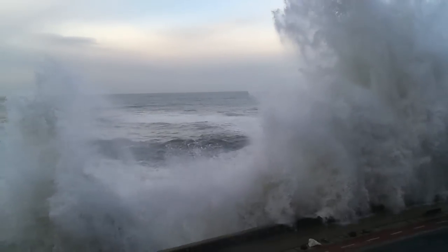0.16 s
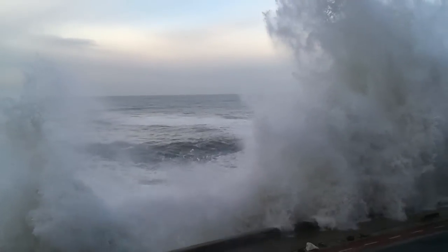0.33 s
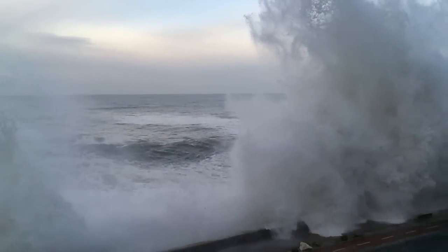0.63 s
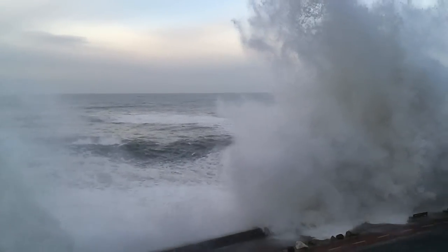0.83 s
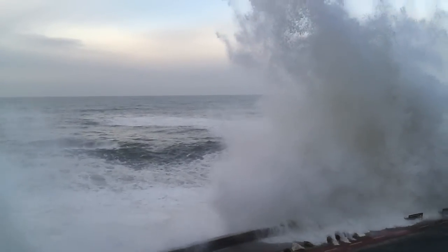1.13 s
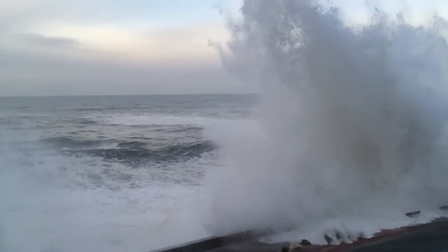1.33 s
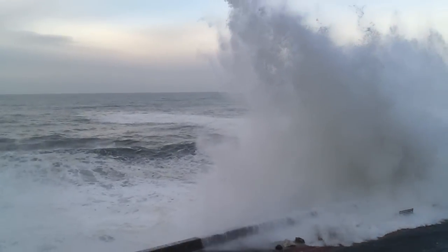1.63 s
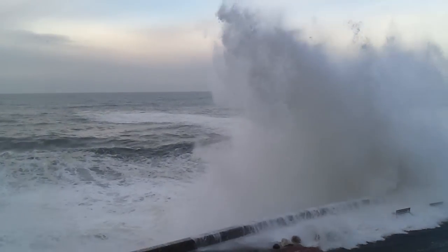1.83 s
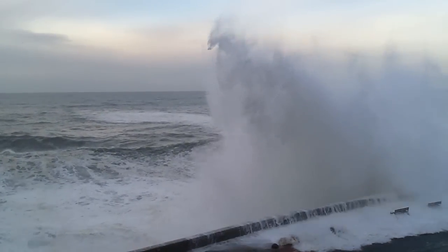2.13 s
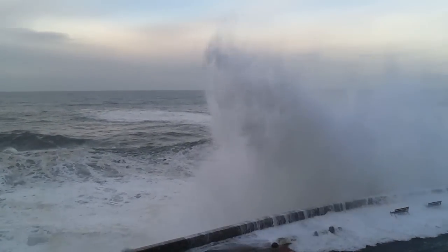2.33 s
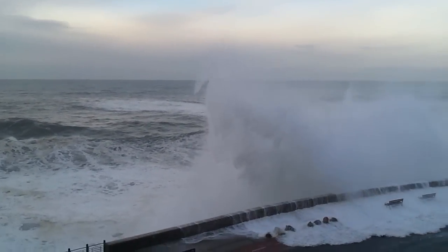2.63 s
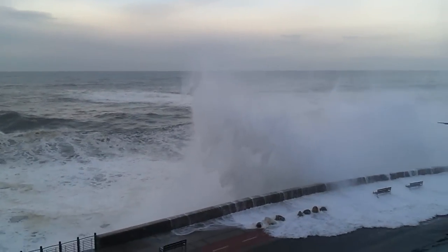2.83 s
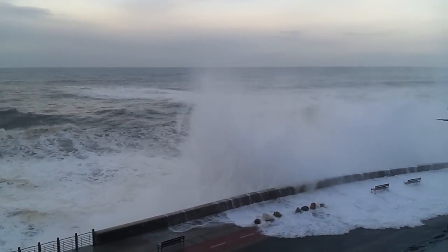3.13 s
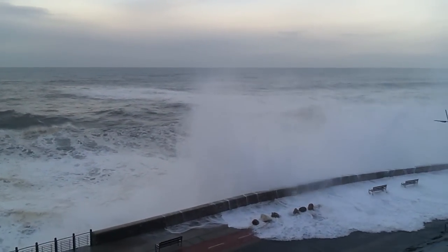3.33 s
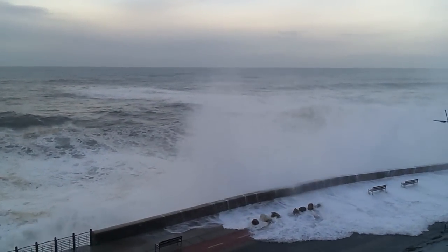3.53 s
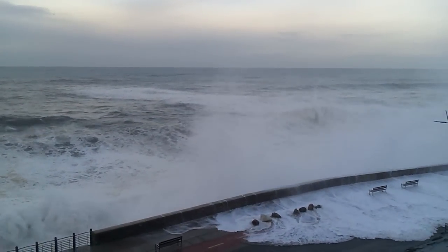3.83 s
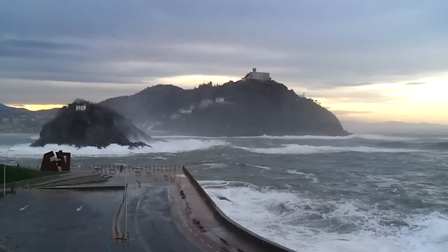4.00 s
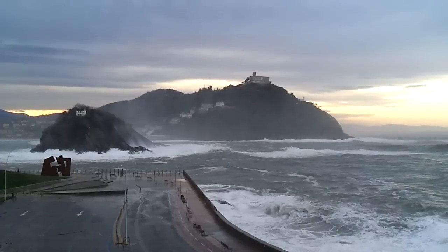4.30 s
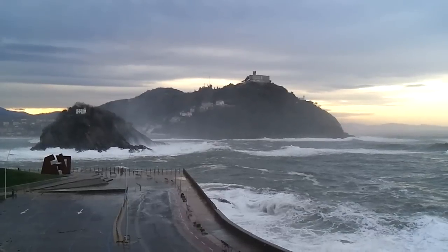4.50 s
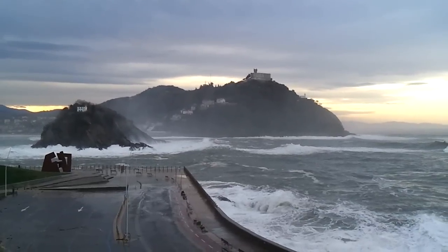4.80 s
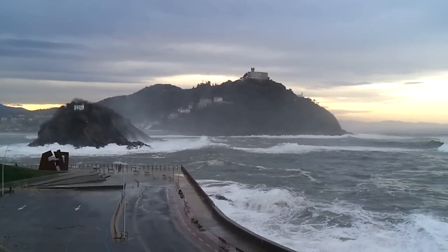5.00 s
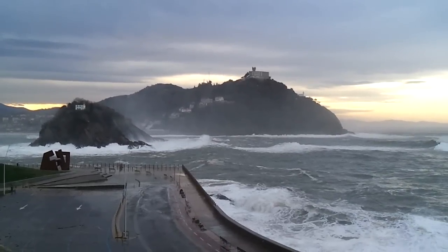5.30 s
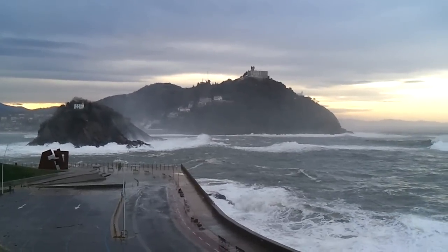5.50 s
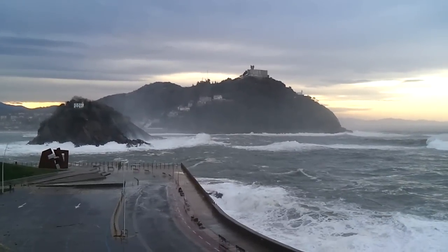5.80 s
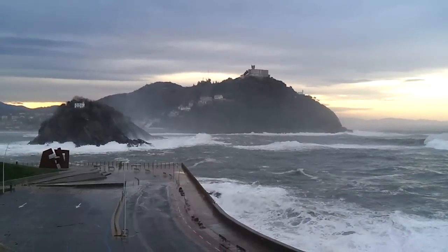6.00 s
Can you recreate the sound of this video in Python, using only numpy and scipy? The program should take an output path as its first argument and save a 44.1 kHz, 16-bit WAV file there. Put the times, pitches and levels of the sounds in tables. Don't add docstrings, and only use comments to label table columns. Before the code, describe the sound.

Outdoors on a stormy seafront, a small exposed microphone catches a wave slamming a wall: low thuds, thick churning roar and a rising bright hiss, with heavy wind rumble. The hiss falls away as drops land and water runs back, foaming again. A brief dead gap follows, then a muffled steady wash of surf farther away, with thin faint hiss and wind bumping the microphone. Essentially mono.

```python
import sys
import numpy as np
from scipy import signal
from scipy.fft import rfft, irfft, next_fast_len
from scipy.io import wavfile

SR = 44100
rng = np.random.default_rng(int(sys.argv[2]) if len(sys.argv) > 2 else 0)


def wrap_up_sound(samples):
    columns = np.atleast_2d(samples).T
    tamed = np.clip(columns, -1, 1)
    steps = np.round(tamed * 32767).astype(np.int16)
    wavfile.write(sys.argv[1], SR, steps)


def natural_amplitude(level_db):
    exponent = np.asarray(level_db, float) / 20
    return 10 ** exponent


N = 271215
T = np.arange(N) / SR

# frequency in Hz, level in dB per Hz.
BURST_LOW = [(1.8, -36.5), (3.0, -0.5), (16, 1.5), (46, -3), (92, -5.5), (209, -17), (245, -16), (328, -21),
             (406, -17), (558, -20), (690, -23), (853, -23), (974, -26), (1410, -25), (1700, -13),
             (2210, -53), (3740, -120)]
NEAR_LOW = [(1.8, -33), (3.0, -3), (21, -2), (54, -0.5), (69, -3), (144, -9.5), (204, -13.5), (245, -11),
            (328, -16), (365, -14.5), (502, -14.5), (620, -17.5), (876, -19.5), (974, -22.5), (1700, -18.5),
            (2210, -51), (3740, -120)]
FAR_LOW = [(1.8, -32.5), (3.0, -22), (15, -3), (28, -5), (102, -13), (133, -17.5), (160, -17.5), (233, -23),
           (265, -20.5), (395, -27), (463, -24.5), (637, -26.5), (747, -29), (1050, -28.5), (1370, -28),
           (1700, -26), (2210, -56), (3740, -120)]
# frequency in Hz, level in dB per Hz.
BURST_HIGH = [(590, -37), (1000, 14), (1410, -8.5), (2060, -0.5), (2900, -10), (3300, -9), (3950, -6),
              (4830, -6), (5620, -2), (6270, -5.5), (8140, -7), (10200, -15.5), (11000, -23.5),
              (12300, -56), (22000, -120)]
FALL_HIGH = [(590, -37), (1000, -7), (1160, 3), (1370, -3.5), (1580, -5), (1960, 0.5), (2720, -9),
             (3320, -9), (3850, -5), (4560, -8.5), (5560, -1), (6260, -5.5), (8190, -6.5), (9690, -12.5),
             (10700, -19), (11900, -49), (22000, -120)]
DRAIN_HIGH = [(590, -37), (1000, -7), (1110, -3), (1220, -1), (1550, -4.5), (1950, 0), (2800, -10),
              (4020, -8.5), (4750, -8), (5610, -8), (6250, -11), (7980, -11), (8800, -16), (9620, -17),
              (10400, -28), (13500, -51), (22000, -120)]
FAR_HIGH = [(590, -30), (1000, -9), (1240, -10.5), (1390, -18), (1630, -12.5), (1820, -15.5), (1980, -20.5),
            (3090, -29), (3890, -23), (4490, -25), (4950, -12.5), (5300, -8), (5830, -15.5), (7560, -15.5),
            (8250, -17.5), (10000, -20), (13000, -55), (22000, -120)]
# time in seconds, peak level in dB.
GUSTS = [(.07, -29), (.22, -23), (.56, -22), (.7, -22.5), (.89, -19), (1.35, -26.5), (1.5, -39),
         (2.08, -28.5), (2.35, -35), (2.52, -33), (2.78, -32), (3.05, -38), (3.56, -37), (3.88, -41),
         (4.64, -32), (4.8, -36), (5.13, -33), (5.42, -30.5), (5.8, -26), (5.92, -30), (6.14, -37)]
# time in seconds, level in dB.
AIRBORNE = [(0.0, -38), (0.14, -35.5), (0.75, -30), (1.12, -27), (1.72, -27.5), (1.95, -30), (2.12, -33),
            (2.5, -35.5), (3.12, -39), (3.5, -37), (4.0, -39), (4.17, -50), (4.35, -50), (6.15, -52)]
# time in seconds, roar gain in dB, foam gain in dB.
HEAVES = [(.12, 1.7, 2), (.3, 1, 2), (.62, 0.1, -0.5), (1.02, 0.8, 0.4), (1.13, 1, 1.5), (2.27, .8, -0.1),
          (2.55, -0.7, -0.5), (3.5, 1.1, -1.3), (3.98, 0.5, 1.8), (4.8, 1, .8), (5.25, -0.5, 0.1)]
# time in seconds, peak level in dB.
AIR_POCKETS = [
    (0.04, -20),
    (0.379, -22),
    (0.604, -22),
    (0.611, -16),
    (1.102, -18),
    (1.324, -19),
]
# time in seconds, low edge in Hz, high edge in Hz, level in dB.
HISS_PATCHES = [
    (.06, 4220, 5300, -46),
    (.06, 5700, 7600, -42),
    (.39, 4200, 5200, -45),
    (1.41, 5700, 7700, -33.5),
    (2.80, 4200, 5260, -54),
    (3.36, 6200, 7700, -45),
    (3.36, 9700, 10500, -60),
    (4.59, 7600, 9100, -62),
    (4.66, 4200, 5160, -51),
    (5.42, 4560, 5800, -53.5),
]

WIND_TOP_HZ, ROAR_TOP_HZ, FOAM_TOP_HZ, SPRAY_TOP_HZ = 36, 1300, 4800, 13000
FALL_S, DRAIN_S, BLEND_S = 2.05, 3.3, 0.18
CUT_S, RESUME_S, RESUME_FADE_S = 4.0042, 4.1713, .002


def rms_one(x):
    return x / np.sqrt(np.mean(x ** 2) + 1e-20)


def ramp(s, length_s):
    return np.clip((T - s) / length_s, 0, 1)


def handover(s):
    return np.pi / 2 * ramp(s - BLEND_S, 2 * BLEND_S)


def drift(size, per_s):
    spacing, settle = 40, 2000
    pole = np.exp(-2 * np.pi * spacing * per_s / SR)
    noise = rng.standard_normal(size // spacing + settle + 2)
    slow = signal.lfilter([1], [1, -2 * pole, pole * pole], noise)[settle:]
    return np.interp(np.arange(size) / spacing, np.arange(len(slow)), rms_one(slow - slow.mean()))


def grains(size, per_s, spread_db):
    born = rng.random(size) < per_s / SR
    uneven = natural_amplitude(spread_db * np.minimum(rng.exponential(1, size), 4))
    return born * rng.standard_normal(size) * uneven


def coloured(source, spectrum, low, high, count, shared_db, own_db, per_s):
    size = len(source)
    points_hz, points_db = np.transpose(spectrum)
    log_hz = np.log(np.maximum(np.arange(size // 2 + 1) * SR / size, 1))
    tone = rfft(source) * natural_amplitude(np.interp(log_hz, np.log(points_hz), points_db))
    step = np.log(high / low) / count
    together, out = shared_db * drift(size, per_s), 0
    for centre in np.log(low) + step * (np.arange(count) + .5):
        share = np.clip(1 - np.abs(log_hz - centre) / step, 0, 1)
        out = out + irfft(tone * share, size) * natural_amplitude(together + own_db * drift(size, 2 * per_s))
    return rms_one(out)


def gusts():
    calm_db, rise_db_per_s, fall_db_per_s = -36.5, 66, 61
    power = natural_amplitude(2 * calm_db)
    for s, db in GUSTS:
        below_peak = np.maximum(rise_db_per_s * (s - T), fall_db_per_s * (T - s))
        power = power + natural_amplitude(2 * (db - below_peak))
    return 10 * np.log10(power)


def wind(size, low):
    return coloured(rng.standard_normal(size), low, 2.5, WIND_TOP_HZ, count=8,
                    shared_db=-1.6, own_db=0.5, per_s=5.0)


def tick():
    age = T - 4.2715
    puff = rng.standard_normal(N) * (age > 0) * np.exp(-np.abs(age) / .0015)
    bright = signal.butter(4, 10000, "high", fs=SR, output="sos")
    return natural_amplitude(-50) * signal.sosfilt(bright, puff)


def hiss_patches():
    size, out = 1900, np.zeros(N)
    hz = np.arange(size // 2 + 1) * SR / size
    for s, low, high, db in HISS_PATCHES:
        noise = irfft(rfft(rng.standard_normal(size)) * (hz > low) * (hz < high), size)
        start = round(s * SR) - size // 2
        out[start:start + size] += natural_amplitude(db) * rms_one(noise) * np.hanning(size)
    return out * [[1], [-1]]


def roar(size, low, churn):
    return coloured(grains(size, 24000, 0.71), low, WIND_TOP_HZ, ROAR_TOP_HZ, count=11,
                    shared_db=.5 * churn, own_db=1.67 * churn, per_s=1.94)


def foam(size, high, churn):
    return coloured(grains(size, 32000, 0.64), high, ROAR_TOP_HZ, FOAM_TOP_HZ, count=7,
                    shared_db=0.66 * churn, own_db=1.1 * churn, per_s=9.0)


def spray(size, high, churn):
    return coloured(grains(size, 36000, 0.93), high, FOAM_TOP_HZ, SPRAY_TOP_HZ, count=7,
                    shared_db=0.25 * churn, own_db=0.93 * churn, per_s=6.0)


def opening_top(x):
    top = signal.sosfiltfilt(signal.butter(4, 10200, "high", fs=SR, output="sos"), x)
    held_back = .75 * (1 - ramp(.3, .6))
    return x - held_back * top


def water():
    spray_db = np.interp(T, *np.transpose(AIRBORNE))
    slam_s, attack_s, hold_s, release_s = 0.31, 0.28, 1.285, 0.28
    slam = ramp(slam_s, attack_s) - ramp(slam_s + attack_s + hold_s, release_s)
    near = T < RESUME_S
    roar_db = np.where(near, -31 + 5 * slam, -32.5)
    backwash_db = 3.5 * ramp(2.97, .25)
    near_foam_db = -30.5 + 0.86 * (spray_db + 27.5) + backwash_db
    far_foam_db = -42 - (T - RESUME_S)
    foam_db = np.where(near, near_foam_db, far_foam_db)
    half_s = 0.17
    for s, roar_gain_db, foam_gain_db in HEAVES:
        heave = ramp(s - half_s, half_s) - ramp(s, half_s)
        roar_db = roar_db + roar_gain_db * heave
        foam_db = foam_db + foam_gain_db * heave
    return roar_db, foam_db, spray_db


def sea(start, end, levels, low, high, churn):
    first, last = max(round(start * SR), 0), min(round(end * SR), N)
    size, out = next_fast_len(last - first), np.zeros(N)
    layers = wind(size, low), roar(size, low, churn), foam(size, high, churn), spray(size, high, churn)
    for db, layer in zip(levels, layers):
        out[first:last] += natural_amplitude(db[first:last]) * layer[:last - first]
    return out


def thumps():
    swing_hz, length_s, gain_db = 42, .016, -5
    out = np.zeros(N)
    for s, db in AIR_POCKETS:
        age = T - s - length_s
        swell = np.exp(-(age / length_s) ** 2)
        out += natural_amplitude(db + gain_db) * swell * np.sin(2 * np.pi * swing_hz * age)
    return out


def scene():
    levels = (gusts(), *water())
    burst = sea(0, FALL_S + BLEND_S, levels, BURST_LOW, BURST_HIGH, churn=0.76)
    fall = sea(FALL_S - BLEND_S, DRAIN_S + BLEND_S, levels, NEAR_LOW, FALL_HIGH, churn=0.41)
    drain = sea(DRAIN_S - BLEND_S, CUT_S, levels, NEAR_LOW, DRAIN_HIGH, churn=0.55)
    far = sea(RESUME_S, N / SR, levels, FAR_LOW, FAR_HIGH, churn=0.79) * ramp(RESUME_S, RESUME_FADE_S)
    falling, draining = handover(FALL_S), handover(DRAIN_S)
    near = np.cos(falling) * opening_top(burst) + np.sin(falling) * np.cos(draining) * fall
    near = near + np.sin(draining) * drain
    mono = thumps() + near + far
    return np.stack([mono, mono])


def ragged_top(x):
    frames = dict(fs=SR, window="cosine", nperseg=2048, noverlap=1024)
    hz, _, lines = signal.stft(x, **frames)
    size = np.abs(lines) + 1e-12
    level = np.sqrt(np.mean(size[(hz > 7500) & (hz < 9000)] ** 2, axis=0))
    step = natural_amplitude(-35.5) * level ** .57
    scatter = natural_amplitude(4.4 * rng.standard_normal(size.shape))
    kept = size * scatter > step
    change = kept * np.maximum(1.6 * step / size, 1) - 1
    change[hz < 8050] = 0
    return x + signal.istft(lines * change, **frames)[1][:N] * (x != 0)


def band_limit(x):
    return signal.sosfilt(signal.butter(12, 14800, fs=SR, output="sos"), x)


def record(dry):
    mix = ragged_top(dry[0]) + tick() + hiss_patches()
    return band_limit(mix)


dry = scene()
out = record(dry)
wrap_up_sound(out)
```